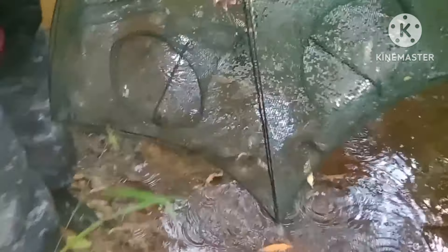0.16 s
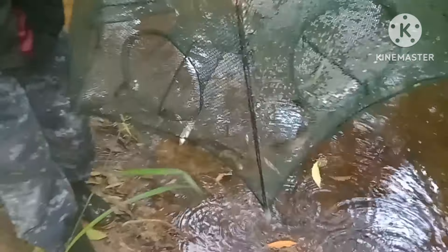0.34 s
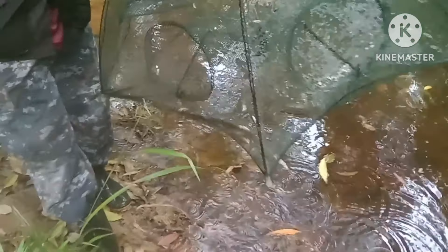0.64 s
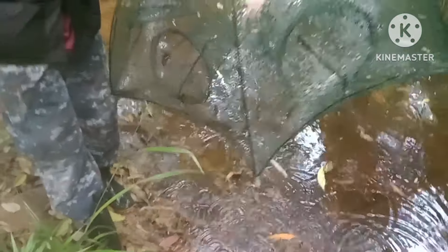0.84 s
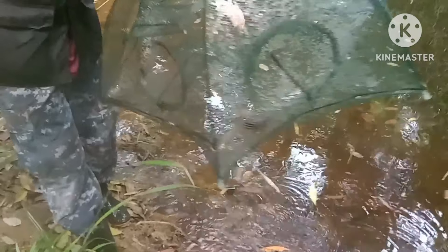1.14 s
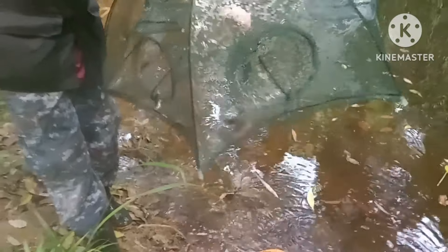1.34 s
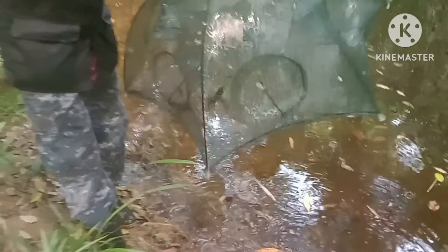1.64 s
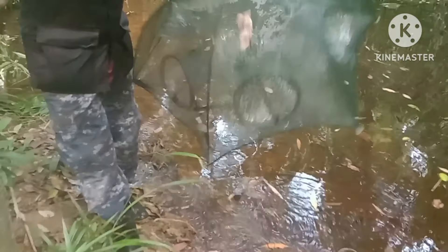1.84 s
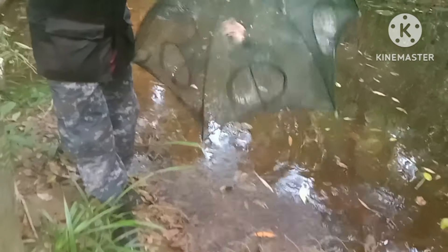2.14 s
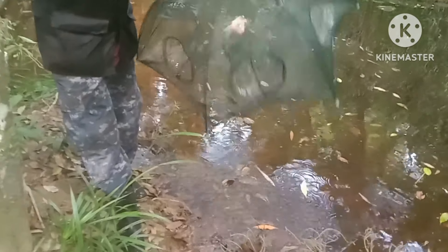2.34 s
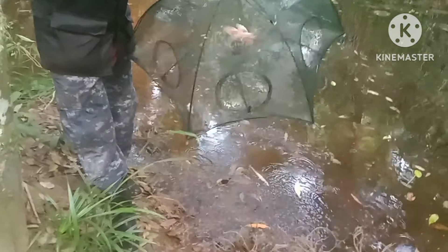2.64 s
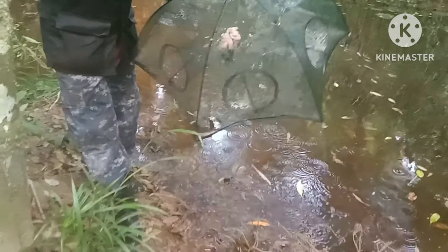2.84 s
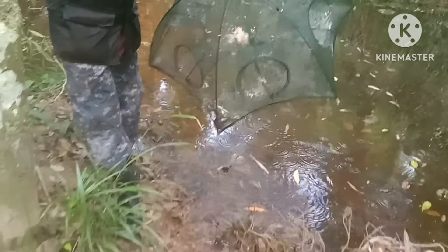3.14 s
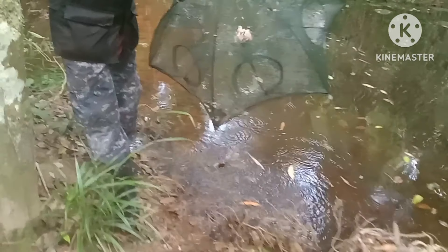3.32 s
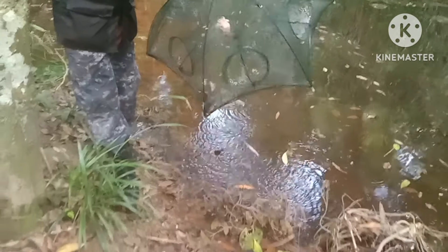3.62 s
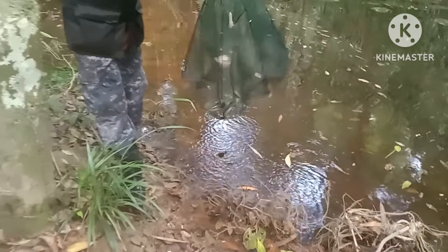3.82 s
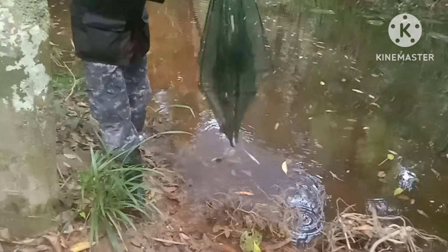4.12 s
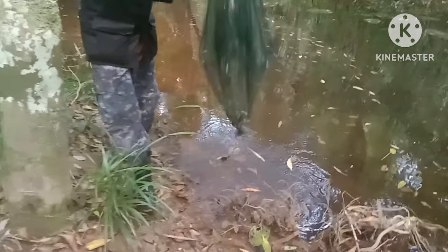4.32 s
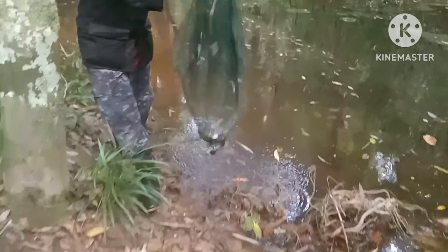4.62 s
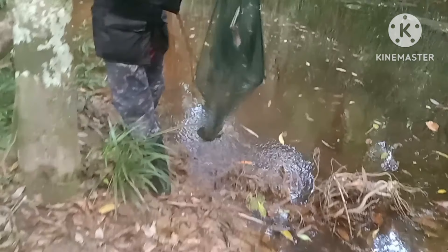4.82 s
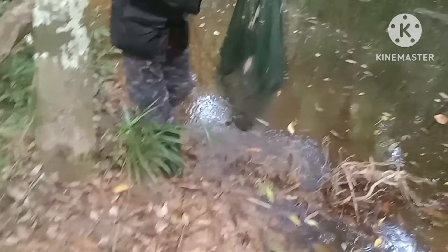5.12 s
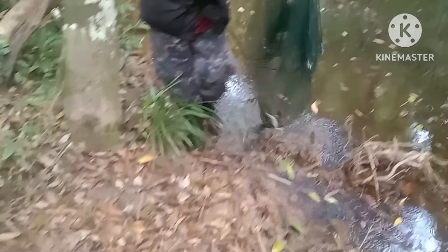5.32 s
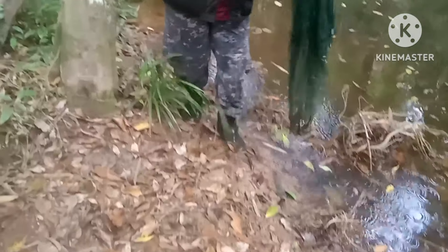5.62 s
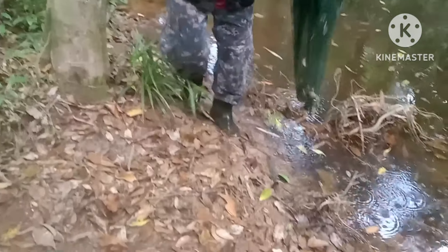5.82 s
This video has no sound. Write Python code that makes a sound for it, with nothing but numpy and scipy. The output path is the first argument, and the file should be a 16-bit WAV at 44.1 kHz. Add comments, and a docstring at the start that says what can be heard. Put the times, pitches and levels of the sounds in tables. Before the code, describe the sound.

A wet mesh trap is handled close by at the edge of a forest pool. It opens at once with sharp snaps inside a burst of wet rustling, then another snap at 0.6 s and denser crackling around 0.9 to 1.2 s. Lighter ticks and small plops follow; from 2.2 to 2.5 s the sound is wetter, with dull slosh and low pops. Rustling swells strongly at 2.7 to 3.0 s, pauses, then snaps crisply at 3.8 s and bursts again at 4.2 s. Softer cloth swishes pass near 4.7 s. A strong rustle comes at 5.1 s with a gust of low buffeting, and the loudest crackle, with clustered snaps, at 5.6 s. Rising drips close the scene from 5.8 s. A soft steady hiss with faint patter continues throughout. The small phone microphone is thin, bright and slightly ringing, little above 9 kHz, with faint handling thumps.

```python
"""A sharp snap in a burst of wet rustling, then more bursts, snaps and plops over a soft steady hiss.
A wet mesh trap is lifted, swung and folded at the edge of a forest pool, near a phone.
Mesh, cloth and leaf litter rustle as shaped noise with tiny clicks and droplet rings; ribs and twigs snap
as decaying clicks and rings, drops plop as rising sines; cloth and water swish as low resonant noise.
The small microphone rings near 2.4, 4.1 and 6.3 kHz and colours all but the low buffeting of air and hand."""
import sys
import numpy as np
from scipy import signal
from scipy.fft import rfft, irfft, next_fast_len
from scipy.io import wavfile
from scipy.ndimage import uniform_filter1d, map_coordinates

SR = 44100
rng = np.random.default_rng(int(sys.argv[2]) if len(sys.argv) > 2 else 0)


def store_wav(level_fs):
    """Save 16-bit WAV to argv[1]."""
    pcm = np.round(np.clip(np.atleast_2d(level_fs), -1, 1) * 32767)
    wavfile.write(sys.argv[1], SR, pcm.T.astype(np.int16))


N = 262833  # samples


def rustle():
    """Stick-slip friction: wet fibres and leaves slip and shed spray, clicks and droplets on unresolved hiss."""
    # spectral shapes of the three layers: f/Hz, relative level/dB
    crackle_shape = [(1500, -52.5), (3300, -2), (16000, 1)]
    scrape_shape = [(800, -40.5), (1500, 1), (3000, -1), (5000, -24.5)]
    slosh_shape = [(200, -28), (350, -15.5), (600, -7.5), (1300, -1), (2400, -31.5)]
    crackle_gain, scrape_gain, slosh_gain = strengths()

    clumps = slips(per_s=220, decay_s=0.012, base=1.09) * amp(0.63 * wobble(220))
    clicks = 0.51 * grains(1700, spread_db=1.5)
    spray = 0.28 * droplets(count=4000, centre_hz=3970, cycles=17.4, spread_db=4)
    ticks = clicks + spray
    gurgle = 0.18 * droplets(count=500, centre_hz=1129, cycles=12, spread_db=1)

    crackle_source = clumps * (patchy(depth_db=4.0) + ticks)
    scrape_source = clumps * amp(2.5 * wobble(30)) * (patchy(depth_db=4.0) + ticks)
    slosh_source = clumps ** 1.2 * amp(0.55 * wobble(25)) * (patchy(depth_db=1.5) + gurgle)

    crackle = crackle_gain * unit(coloured(crackle_source, crackle_shape))
    scrape = scrape_gain * unit(coloured(scrape_source, scrape_shape))
    slosh = slosh_gain * unit(coloured(slosh_source, slosh_shape))
    return crackle + scrape + slosh


def strengths():
    """Incoherent sources add in power: each burst rises, holds and decays over the draining of the mesh."""
    # handlings of the wet mesh: t/s at full strength, rise/s, hold/s, crackle level/dB,
    # scrape level/dB and slosh level/dB (both relative to the crackle)
    bursts = [(0.049, 0.094, 0.064, -29, -3.5, -14), (0.562, .03, 0.089, -41, -2, -31),
              (0.868, 0.18, 0.041, -29, -6.5, -17), (0.943, .04, .02, -36, -10, -25),
              (1.002, .11, 0.094, -31, -5, -21), (1.142, 0.059, 0.045, -34.5, 0, -24),
              (1.299, 0.026, 0.015, -51, 11, -9), (1.41, 0.033, 0.026, -31.5, -10, -12.5),
              (1.512, 0.078, 0.028, -42, -7.5, -13.5), (1.816, 0.16, 0.03, -43, -14, -30),
              (2.202, 0.018, 0.057, -36.5, -3.5, -5), (2.325, 0.039, 0.046, -34, -1, -5.5),
              (2.426, 0.12, .1, -33, -1, -3), (2.691, 0.27, 0.081, -25.5, -3, -11.5),
              (2.813, 0.099, 0.035, -26.5, -6.5, -8.5), (3.019, 0.15, 0.017, -26.5, -11.5, -17),
              (3.468, 0.038, 0.018, -43.5, -5, -12.5), (3.622, 0.014, .012, -33.5, -8, -11),
              (3.646, .04, 0.054, -50, 4, -9), (3.79, 0.17, 0.041, -26.5, -6.5, -21),
              (4.032, .03, 0.024, -59, 4.5, -9), (4.22, 0.021, 0.031, -26.5, -5, -8),
              (4.306, .02, 0.066, -39, -11.5, -14.5), (4.625, 0.1, 0.12, -37, -3.5, -8.5),
              (4.849, 0.073, .03, -35.5, -9.5, -15), (5.001, 0.17, 0.077, -30, -12.5, -19.5),
              (5.12, 0.077, 0.085, -23.5, -2.5, -9.5), (5.284, .06, 0.022, -35.5, -6.5, -9),
              (5.346, 0.039, 0.032, -38, -10, -2.5), (5.468, 0.088, 0.038, -41.5, 1.5, -9.5),
              (5.611, 0.016, 0.04, -21, -5, -14), (5.772, 0.058, 0.16, -43.5, -12, -7.5)]
    # draining that goes on between the bursts: t/s, crackle level/dB
    drain = [(0, -32), (.4, -49), (.7, -44), (1.3, -46), (2.0, -50), (3.15, -46.5), (3.4, -55.5),
             (3.92, -50.5), (4.15, -64), (4.5, -48), (5.96, -44.5)]
    # decay rates of crackle, scrape and slosh: dB/s
    fall_db_per_s = [305, 384, 411]
    rise_db = 30  # climb within one rise time
    drain_layers_db = np.array([[0], [-12], [-14.5]])  # crackle, scrape, slosh relative to crackle

    t = np.arange(N) / SR
    drain_db, = curves(drain)
    power = amp(2 * (drain_db + drain_layers_db))
    for s, rise, hold, db, scrape_db, slosh_db in bursts:
        start = max(round((s - 2 * rise) * SR), 0)
        near = slice(start, round((s + hold + .3) * SR))
        layers_db = db + np.array([[0], [scrape_db], [slosh_db]])
        climb_db = rise_db * np.minimum(t[near] - s, 0) / rise
        fade_db = np.outer(fall_db_per_s, np.maximum(t[near] - s - hold, 0))
        power[:, near] += amp(2 * (layers_db + climb_db - fade_db))
    return np.sqrt(power)


def snaps():
    """Impulsive fracture of ribs and twigs: a click, a brief modal ring and a puff of scattered sound."""
    # snaps: t/s, level/dB before filtering, ring f/Hz
    fractures = [(.0476, -13.5, 6230), (0.1158, -9.5, 6700), (0.2881, -26, 5600), (.342, -30, 6550),
                 (.4334, -18.5, 5600), (0.6084, -13, 5660), (0.9894, -27, 6400), (1.1293, -24.5, 5310),
                 (1.4052, -29, 5040), (1.639, -26.5, 5360), (1.664, -28, 6860), (1.836, -21.5, 7050),
                 (1.8448, -27.5, 6260), (1.8759, -21, 6700), (1.973, -31.5, 5440), (2.083, -30.5, 5300),
                 (2.1035, -29.5, 4350), (2.187, -28.5, 6430), (2.251, -29, 6000), (2.3105, -24, 4130),
                 (2.3414, -20.5, 6400), (2.7667, -21, 6510), (2.9222, -22.5, 6260), (2.9958, -18.5, 6540),
                 (3.0216, -16, 6630), (3.2337, -32.5, 6160), (3.352, -39, 6940), (3.62, -17.5, 4000),
                 (3.7663, -17, 5850), (3.7843, -8, 5940), (3.8257, -16, 6230), (3.8531, -15.5, 4300),
                 (3.8964, -37, 4120), (3.927, -29.5, 4300), (3.9717, -31, 4250), (3.995, -28.5, 6800),
                 (4.071, -28.5, 6440), (4.0842, -31, 4020), (4.1065, -29.5, 6760), (4.153, -33.5, 3940),
                 (4.2936, -17.5, 6330), (4.3202, -21, 6300), (4.3776, -27, 5970), (4.574, -22, 6300),
                 (4.9696, -24, 6700), (5.1212, -14.5, 6200), (5.493, -22, 6600), (5.5994, -15, 6400),
                 (5.6128, -8.5, 4030), (5.644, -12, 4090), (5.6502, -9.5, 4130), (5.705, -27, 5900),
                 (5.9213, -24.5, 6200)]
    out, t = np.zeros(N + SR), np.arange(SR // 10) / SR
    for s, db, hz in fractures:
        noise = rng.standard_normal((2, len(t)))
        click = amp(-60 * t / 0.005) * noise[0]  # 60 dB decay in 5 ms
        ring = 0.78 * amp(-60 * t / 0.0078) * np.sin(2 * np.pi * hz * t)
        puff = amp(-6.0 - 60 * t / 0.047) * noise[1]
        out[round(s * SR):][:len(t)] += amp(db) * (click + ring + puff)
    return coloured(out[:N], [(500, -23.0), (2500, -4.0), (16000, -4)])


def plops():
    """Bubble resonance: trapped air rings, rising in pitch near the surface; longer rings start more softly."""
    # drops on the water, short ones pop and long ones ring:
    # t/s, level/dB before filtering, initial f/Hz, t60/s, pitch rise/(Hz/ms)
    bubbles = [(.560, -26.5, 2080, .047, 5), (0.59, -27, 2660, 0.016, 5), (0.646, -17, 2020, 0.042, 3.3),
               (1.084, -20, 2750, 0.033, 4), (1.224, -21, 2420, .02, 7), (1.308, -26, 2580, .018, 7),
               (1.366, -33, 910, .012, 4), (1.677, -29.5, 2200, .031, 4), (2.095, -39, 784, 0.095, 1.5),
               (2.199, -22, 1030, 0.017, 3), (2.209, -14, 880, 0.017, 5), (2.327, -20, 810, 0.037, 1.2),
               (2.454, -8.5, 1050, 0.01, 5), (2.516, -11.5, 870, .01, 4), (2.766, 4, 1180, 0.0045, 6),
               (2.879, -18.5, 2160, 0.021, 7), (3.4907, -15, 1700, 0.0013, 8), (3.784, -4, 1750, 0.012, 9),
               (3.994, -33, 1770, .022, 8), (4.221, -6, 950, 0.0066, 4), (4.384, -27.5, 1310, .015, 6),
               (4.402, -27.5, 1300, 0.013, 6), (4.671, -16.5, 1870, 0.0049, 8), (5.094, -13, 1950, .01, 8),
               (5.5819, -12, 980, 0.01, 5), (5.8036, -10.5, 1260, 0.015, 8),
               (5.804, -23.5, 796, 0.045, 1.7), (5.805, -22.5, 1600, 0.037, 3),
               (5.907, -27.5, 755, 0.051, 2.4), (5.923, -19.5, 958, .065, 7.3),
               (5.938, -33.5, 1020, .3, 18.4)]
    out, t = np.zeros(N + SR), np.arange(SR // 8) / SR
    for s, db, hz, t60, rise in bubbles:
        rise_hz_per_s = rise * 1000
        phase = 2 * np.pi * (hz * t + rise_hz_per_s * t * t / 2)
        onset = 1 - np.exp(-t / min(0.037 * t60, .0015))
        out[round(s * SR):][:len(t)] += amp(db - 60 * t / t60) * onset * np.sin(phase)
    return coloured(out[:N], [(200, -8.5), (600, -0.5)])


def swishes():
    """Noise-excited resonance: cloth and water move past with a dull hum."""
    # swishes: t/s at the centre, level/dB, resonance f/Hz, half length/s
    passes = [(.08, -53, 410, 0.085), (0.517, -61, 490, 0.056), (.7, -61, 377, 0.21),
              (0.817, -56.5, 380, 0.071), (1.867, -55.5, 352, 0.078), (2.22, -55, 340, .04),
              (2.94, -56.5, 412, 0.088), (3.728, -53, 538, .06), (4.031, -62, 393, 0.12),
              (4.25, -54, 340, .05), (4.74, -47.5, 584, 0.052), (4.88, -54, 640, 0.16),
              (5.24, -55, 320, .08), (5.9, -61, 330, .06)]
    return swells(passes, t60=0.029)


def buffet():
    """Pressure fluctuation and conduction: air rumbles on the microphone port, a hand thumps the case."""
    # air moving on the port: t/s, level/dB
    air_level = [(0.0, -76.5), (1.64, -78), (4.85, -79.5), (5.18, -67), (5.48, -79.5), (5.96, -70.5)]
    # spectral shape of that air: f/Hz, relative level/dB
    air_shape = [(15, -54), (25, -32), (81, -1.5), (172, -3.5), (211, -4.5), (400, -7), (520, -23.5),
                 (880, -120)]
    # soft thumps of the hand on the phone: t/s at the centre, level/dB before filtering,
    # resonance f/Hz, half length/s
    thumps = [(.28, -64.5, 115, .05), (.53, -72, 70, .06), (1.75, -69, 80, 0.089), (1.9, -71.5, 80, 0.12),
              (2.58, -60, 161, 0.055), (3.24, -68, 76, .04), (3.49, -59, 114, 0.039), (3.97, -72, 70, .08),
              (5.15, -70, 90, 0.045), (5.25, -65, 76, 0.067), (5.36, -65.5, 81, 0.048),
              (5.81, -69, 105, .14)]
    level_db, = curves(air_level)
    rumble = coloured(rng.standard_normal(N), air_shape)
    air = amp(level_db) * unit(amp(4.2 * wobble(8)) * rumble)
    case = coloured(swells(thumps, t60=0.043), [(25, -29), (70, -5.5)])
    return air + case


def forest():
    """Superposition of far trickling and leaves: a soft steady hiss with a faint patter."""
    # spectral shape of the far hiss: f/Hz, relative level/dB
    far_shape = [(150, -45.5), (400, -6), (1000, -7.5), (3000, -10.5), (6000, -9), (12000, -8.5)]
    level_db = -51.5  # before the microphone
    clicks = 0.19 * grains(470, spread_db=8.5)
    trickle = 0.4 * droplets(count=900, centre_hz=4660, cycles=8.4, spread_db=2)
    return amp(level_db) * unit(coloured(patchy(depth_db=3.3) + clicks + trickle, far_shape))


def grains(per_s, spread_db):
    """Random impulse process: sparse clicks, mostly small, a few large."""
    chance, size, sign = rng.random(N), rng.exponential(size=N), rng.standard_normal(N)
    struck = chance < per_s / SR
    return unit(struck * amp(spread_db * np.minimum(size, 3.3)) * sign)


def droplets(count, centre_hz, cycles, spread_db):
    """Damped oscillation: tiny drops at random moments, each ringing some cycles at its own pitch."""
    when, pitch, size, life = rng.random((count, 4)).T[:, :, None]
    k = np.arange(450)  # samples in one ring
    hz = centre_hz * 2 ** (2.4 * (pitch - .5))  # spread over 2.4 octaves
    decay = np.exp(-k / SR * hz / (cycles * (0.12 + life)))
    ring = decay * np.sin(2 * np.pi * hz * k / SR)
    gain = amp(-spread_db * np.log(np.maximum(size, .02)))
    places = (when * N).astype(int) + k
    return unit(np.bincount(places.ravel(), (gain * ring).ravel(), minlength=N)[:N])


def slips(per_s, decay_s, base):
    """Relaxation after sudden release: an envelope of abrupt starts that die away, over a steady base."""
    tail = np.exp(-np.arange(SR // 10) / SR / decay_s)
    starts = abs(grains(per_s, spread_db=2.0))
    return base + unit(signal.fftconvolve(starts, tail)[:N])


def swells(rows, t60):
    """Forced vibration of one low mode: noise drives each row's resonance, which swells and fades."""
    out = np.zeros(N + SR)
    for s, db, hz, length in rows:
        t = np.arange(round(2 * length * SR)) / SR
        mode = amp(-60 * t / t60) * np.sin(2 * np.pi * hz * t)
        hum = signal.fftconvolve(rng.standard_normal(len(t)), mode)[:len(t)]
        start = max(round((s - length) * SR), 0)
        out[start:][:len(t)] += amp(db) * unit(np.hanning(len(t)) * hum)
    return out[:N]


def patchy(depth_db):
    """Time-frequency modulation: white noise whose level differs from patch to patch in time and pitch."""
    z = signal.stft(rng.standard_normal(N), nperseg=256)[2]
    field = uniform_filter1d(rng.standard_normal(z.shape), size=2, axis=0)  # across pitch
    field = uniform_filter1d(field, size=18, axis=1)  # along time
    return unit(signal.istft(z * amp(depth_db * unit(field)), nperseg=256)[1][:N])


def coloured(x, points):
    """Minimum-phase filtering: x through the causal filter whose gain follows the (f/Hz, level/dB) points."""
    m = 2 * next_fast_len(N // 2 + 4096)
    f, db = np.transpose(points)
    log_f = np.log(np.fft.rfftfreq(m, 1 / SR) + 1)
    gain_db = np.interp(log_f, np.log(f + 1), db)
    cepstrum = irfft(np.log(amp(gain_db)), m)
    cepstrum[1:m // 2] *= 2  # folding the cepstrum makes the response causal
    cepstrum[m // 2 + 1:] = 0
    return irfft(rfft(x, m) * np.exp(rfft(cepstrum)), m)[..., :N]


def wobble(rate):
    """Band-limited fluctuation: a smooth random curve, rate knots a second."""
    knots = rng.standard_normal(int(N * rate / SR) + 4)
    return map_coordinates(knots, [np.arange(N) * rate / SR])


def curves(rows):
    """Linear interpolation: one value per sample for each column after the time."""
    s, *cols = np.transpose(rows)
    return [np.interp(np.arange(N) / SR, s, c) for c in cols]


def amp(db):
    """Decibel law: 20 dB for each factor of ten in amplitude."""
    return 10 ** (np.asarray(db) / 20)


def unit(x):
    """Normalisation to a root-mean-square value of one."""
    return x / np.sqrt(np.mean(x ** 2) + 1e-20)


def scene():
    """Linear superposition: airborne sound passes the microphone's resonances; buffeting acts on the port."""
    # response of the microphone: f/Hz, gain/dB
    microphone = [(60, -33.5), (350, -15), (1700, -15), (2480, -6), (2950, -9), (3400, -14), (3750, -4.5),
                  (4100, 0), (4700, -2.5), (6300, 3), (7900, -5.5), (8800, -20), (9250, -18),
                  (10100, -35.5), (11400, -38), (12400, -52.5), (13600, -57), (15400, -66)]
    airborne = rustle() + snaps() + plops() + swishes() + forest()
    return (coloured(airborne, microphone) + buffet())[None]


def record(dry):
    """Band limitation: the phone keeps nothing above its upper limit."""
    top_hz = 15400
    m = next_fast_len(N)
    passed = np.fft.rfftfreq(m, 1 / SR) < top_hz
    return irfft(rfft(dry, m) * passed, m)[:, :N]


dry = scene()
out = record(dry)
store_wav(out)
```